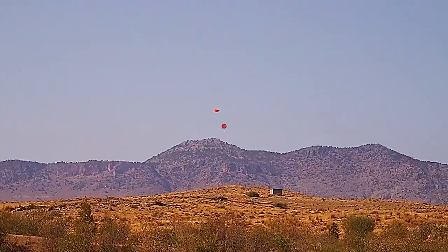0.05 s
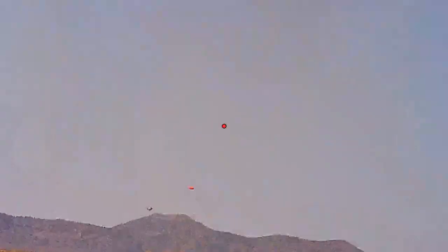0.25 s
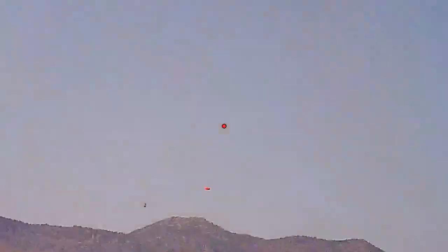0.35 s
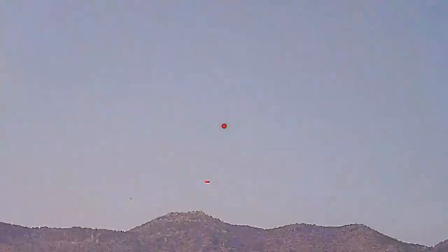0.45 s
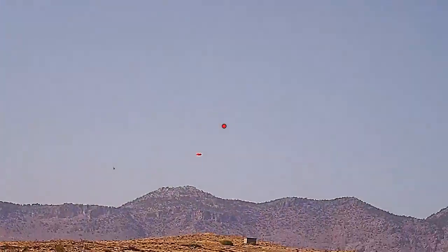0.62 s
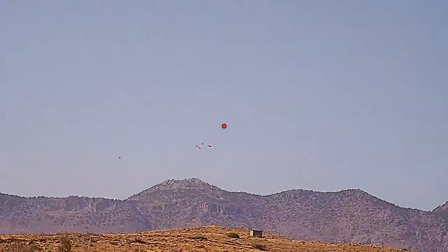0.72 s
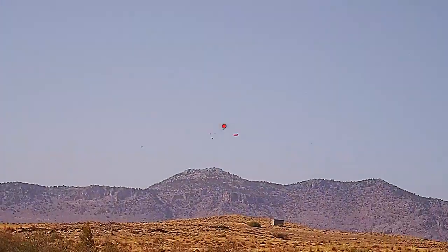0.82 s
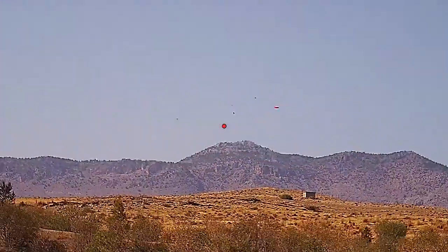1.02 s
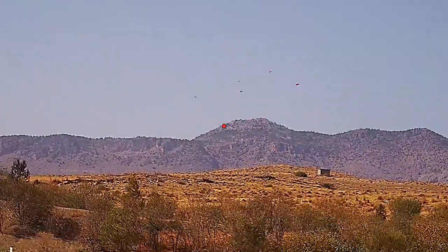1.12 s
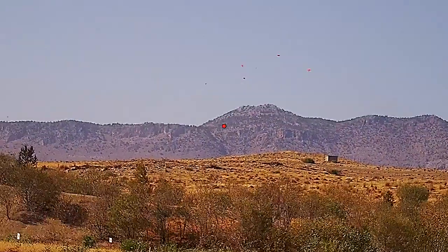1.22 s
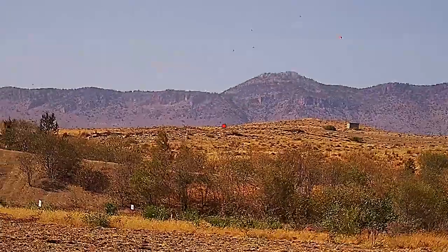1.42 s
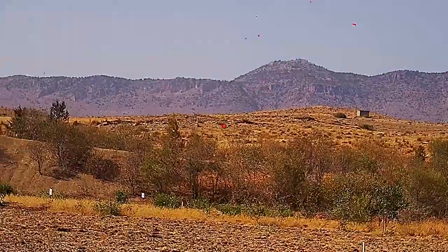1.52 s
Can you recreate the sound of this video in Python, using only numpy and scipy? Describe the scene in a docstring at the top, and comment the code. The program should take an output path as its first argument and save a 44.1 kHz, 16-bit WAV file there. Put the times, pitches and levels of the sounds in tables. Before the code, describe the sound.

A single shotgun shot goes off right beside the microphone, overloading it with a choppy, cracking blast. Open hills return a dull rumble with low booms and a few sharper slaps, fading away.

```python
"""Open hills, one shotgun shot, microphone right at the gun.
A short rush leads into the muzzle blast, which drives the microphone into its rails. A deep recoil
shudder holds it there and chops the sound; a second crack breaks through. Nearby ground scatters
the report and the slopes return it: a dull rumble, low booms, a few sharper slaps off rock faces."""
import sys
import numpy as np
from scipy import signal
from scipy.fft import rfft, irfft
from scipy.io import wavfile
from scipy.ndimage import uniform_filter1d

SR = 44100
rng = np.random.default_rng(int(sys.argv[2]) if len(sys.argv) > 2 else 0)


def dump(signal):
    """Clip the signal to [-1, 1] and save it as 16-bit WAV at the path in sys.argv[1]."""
    limited = np.clip(np.atleast_2d(signal).T, -1, 1)
    pcm = np.round(limited * 32767).astype(np.int16)
    wavfile.write(sys.argv[1], SR, pcm)


N = 68355

# Noise spectra. Each row: frequency in Hz, relative density in dB.
AIR_SPECTRUM = [(25, 8.5), (100, -13.5), (800, -28), (3700, -32.5), (6000, -38.5), (8000, -47.5)]
RUSH_SPECTRUM = [(30, 8), (130, 8.5), (450, -5.5), (1000, -12.5), (2400, -14.5), (5000, -38.5), (8000, -50)]
BLAST_SPECTRUM = [(30, -12), (90, -0.5), (170, 3.5), (450, -3.5), (900, -13), (1500, -22.5), (3600, -30),
                  (8000, -56.5)]
RUMBLE_SPECTRUM = [(25, 1.5), (45, 3.5), (65, -2), (100, -1.5), (140, 4.5), (190, -5.5), (320, -20.5),
                   (445, 1.5), (610, -13), (750, -5.5), (980, -13.5), (1230, -30.5), (2200, -28.5),
                   (2700, -36.5), (3800, -36), (5000, -47.5), (8000, -63.5)]
SCATTER_SPECTRUM = [(100, -10.5), (500, 8), (1200, -5), (2400, -6.5), (4000, -14.5), (8000, -31.5)]
CRACK_SPECTRUM = [(150, -2.5), (700, -0.5), (1500, -2), (2400, 0.5), (4000, -16), (8000, -17.5)]
SLAP_SPECTRUM = [(150, -11), (450, 18), (1000, -2), (2000, -5), (3000, -15), (7000, -46.5)]
# Band decays. Each row: frequency in Hz, T60 in seconds.
BLAST_T60 = [(60, .22), (140, .2), (400, 0.09), (1200, 0.16), (5000, 0.1)]
RUMBLE_T60 = [(30, 1.73), (140, 2.58), (450, 2.37), (1000, 2), (2000, 1.85), (3300, 1.35), (5500, 0.79)]
# Hillsides lifting the rumble. Each row: crest time in seconds, half-width in seconds, lift in dB.
RUMBLE_SWELLS = [(0.506, 0.058, 1.5), (0.764, 0.058, 3), (0.982, 0.059, 3), (1.33, 0.037, 1)]
# Slow swing of the overloaded microphone. Each row: time in seconds, pre-clip offset in full scale.
MIC_SWING = [(.252, 0), (.263, 2.5), (.285, 0.85), (.305, -0.36), (.33, -1.02), (.355, -0.69), (.40, -0.12),
             (.45, 0), (.52, .1), (.8, 0)]
# Slope echoes. Each row: crest time in seconds, half-width in seconds, peak in dB.
SLOPE_BOOMS = [(0.348, 0.0079, -13.5), (0.457, 0.034, -17.5), (0.52, 0.016, -9), (0.601, 0.055, -20.5),
               (0.669, 0.014, -22), (0.745, 0.049, -24), (0.899, .045, -20.5), (1.002, 0.037, -29.5),
               (1.11, 0.021, -26.5), (1.173, 0.045, -29.5), (1.422, 0.014, -37.5), (1.508, 0.023, -39.5)]
# Rock-face echoes. Each row: start in seconds, level in dB.
ROCK_SLAPS = [(.379, -23), (0.442, -36), (0.706, -30.5), (1.226, -46)]

SHOT_S, BLAST_RISE_S, ECHO_RISE_S = .226, .0027, .055
FLUTTER_HZ = 21.97
TIME_S = np.arange(N) / SR
BIN_HZ = np.arange(N // 2 + 1) * SR / N


def undb(db):
    """Decibels to gain."""
    return 10 ** (np.asarray(db) / 20)


def over_hz(points):
    """(Hz, value) rows interpolated to every bin."""
    hz, value = np.array(points, float).T
    return np.interp(np.log(BIN_HZ + 1), np.log(hz), value)


def noise(spectrum):
    """Shaped noise, unit RMS, no infrasound."""
    x = irfft(rfft(rng.standard_normal(N)) * undb(over_hz(spectrum)) * (BIN_HZ > 18), N)
    return x / x.std()


def burst(start_s, rise_s, t60_s, hold_s=0):
    """Linear rise, hold, exponential fall."""
    age_s = TIME_S - start_s
    fall_s = np.maximum(age_s - rise_s - hold_s, 0)
    return np.clip(age_s / rise_s, 0, 1) * np.exp(-np.log(1000) * fall_s / t60_s)


def crest(at_s, half_s):
    """Gaussian swell."""
    return np.exp(-((TIME_S - at_s) / half_s) ** 2)


def wander(rate_hz):
    """Smooth random curve, unit spread."""
    step = int(SR / rate_hz)
    held = np.repeat(rng.standard_normal(N)[:N // step + 1], step)
    x = uniform_filter1d(held, step)[:N]
    return x / x.std()


def dying_noise(spectrum, decay, rise_s, hold_s=0):
    """Noise from the shot onward, one T60 per band."""
    bins, out = rfft(noise(spectrum)), 0
    for k, (_, t60_s) in enumerate(decay):
        band = over_hz([(hz, j == k) for j, (hz, _) in enumerate(decay)])
        out = out + irfft(bins * band, N) * burst(SHOT_S, rise_s, t60_s, hold_s)
    return out


def still_air(level_db=-59):
    """Faint steady background."""
    return undb(level_db) * noise(AIR_SPECTRUM)


def rush(start_s=.212, level_db=-12.5):
    """Dull noise starting just ahead of the blast."""
    envelope = burst(start_s, rise_s=.005, t60_s=.44, hold_s=SHOT_S - start_s)
    return undb(level_db) * noise(RUSH_SPECTRUM) * envelope


def muzzle_blast(level_db=14):
    """The report, far above the microphone's limit."""
    return undb(level_db) * dying_noise(BLAST_SPECTRUM, BLAST_T60, BLAST_RISE_S, hold_s=.014)


def rumble(level_db=-16.5, flutter_db=1.08):
    """Countless echoes merge and flutter; treble dies first."""
    lift_db = sum(db * crest(at_s, half_s) for at_s, half_s, db in RUMBLE_SWELLS)
    gain = undb(level_db + flutter_db * wander(FLUTTER_HZ) + lift_db)
    return gain * dying_noise(RUMBLE_SPECTRUM, RUMBLE_T60, ECHO_RISE_S)


def ground_scatter(level_db=-22.5):
    """Bright return from nearby ground and scrub."""
    return undb(level_db) * noise(SCATTER_SPECTRUM) * burst(SHOT_S, ECHO_RISE_S, t60_s=.54)


def recoil(start_s=.262, start_hz=24.55, sweep_hz_per_s=29, shudder_db=11.5):
    """Recoil shakes the microphone: a damped, quickening shudder on one slow swing."""
    age_s = TIME_S - start_s
    cycles = age_s * (start_hz + sweep_hz_per_s * age_s / 2)
    shudder = np.sin(2 * np.pi * cycles) * burst(start_s, BLAST_RISE_S, t60_s=.39)
    swing = np.interp(TIME_S, *np.array(MIC_SWING).T)
    return undb(shudder_db) * shudder + uniform_filter1d(swing, size=400)


def crack(level_db=12):
    """Second sharp crack through the overload, likely off close ground."""
    return undb(level_db) * noise(CRACK_SPECTRUM) * burst(start_s=.272, rise_s=.001, t60_s=.016)


def slope_booms(centre_hz=138.2, spread=.024):
    """Single slopes return swells of one wavering low note."""
    pitch_hz = centre_hz * (1 + spread * wander(FLUTTER_HZ))
    note = np.sin(2 * np.pi * np.cumsum(pitch_hz) / SR)
    return note * sum(undb(db) * crest(at_s, half_s) for at_s, half_s, db in SLOPE_BOOMS)


def rock_slaps():
    """Rock faces return short, brighter echoes."""
    envelope = sum(undb(db) * burst(at_s, rise_s=.0013, t60_s=.14) for at_s, db in ROCK_SLAPS)
    return noise(SLAP_SPECTRUM) * envelope


def scene():
    """Shot, recoil and echoes over still air; mono."""
    shot = rush() + muzzle_blast() + recoil() + crack()
    echoes = rumble() + ground_scatter() + slope_booms() + rock_slaps()
    return (shot + echoes + still_air())[None]


def record(dry):
    """The microphone clips almost flat at its rails; two low-passes cut the treble."""
    rail, leak_db = .643, -34.5
    mic_hz, top_hz = 5600, 6750
    clipped = np.clip(dry, -rail, rail) + undb(leak_db) * dry
    dulled = signal.sosfilt(signal.butter(4, mic_hz, fs=SR, output="sos"), clipped)
    return signal.sosfilt(signal.cheby1(8, .2, top_hz, fs=SR, output="sos"), dulled)


dry = scene()
out = record(dry)
dump(out)
```